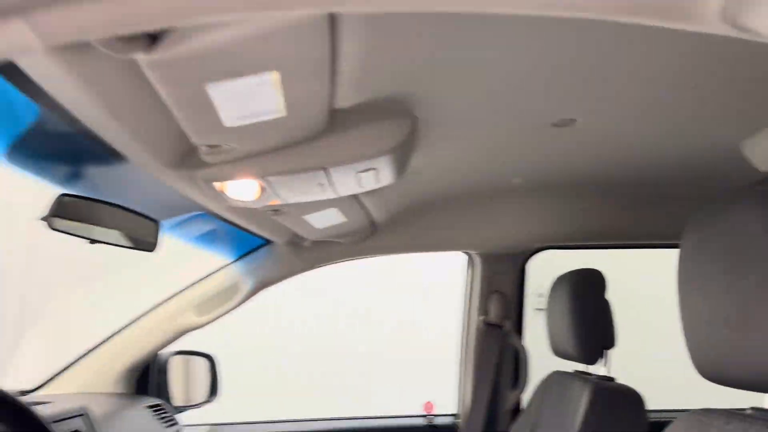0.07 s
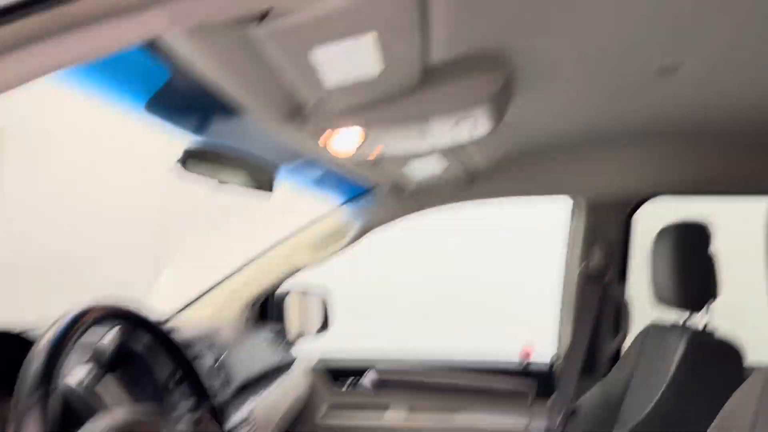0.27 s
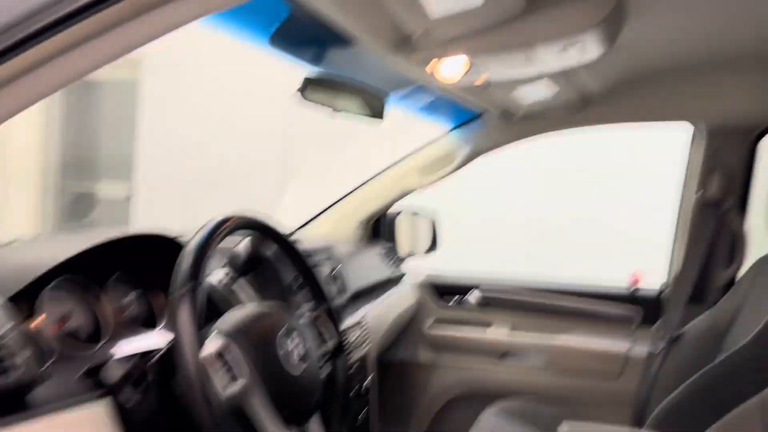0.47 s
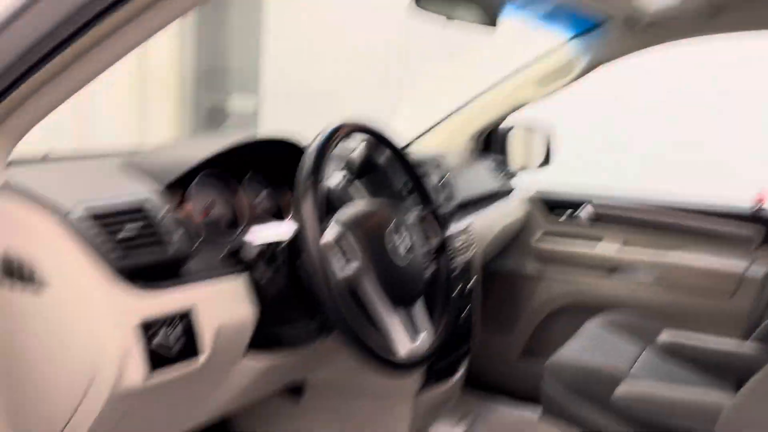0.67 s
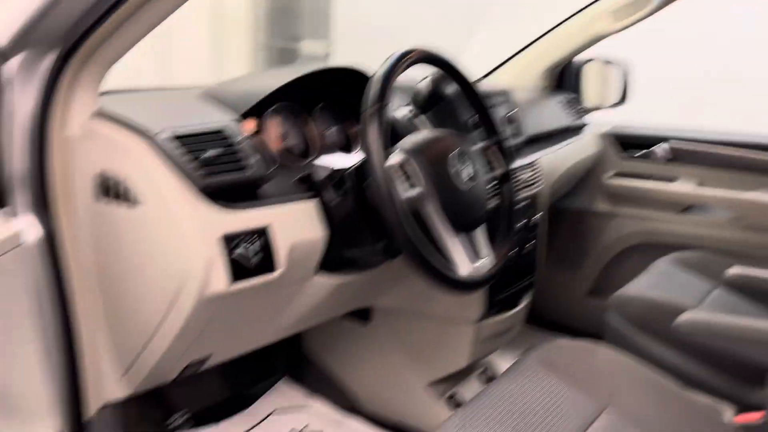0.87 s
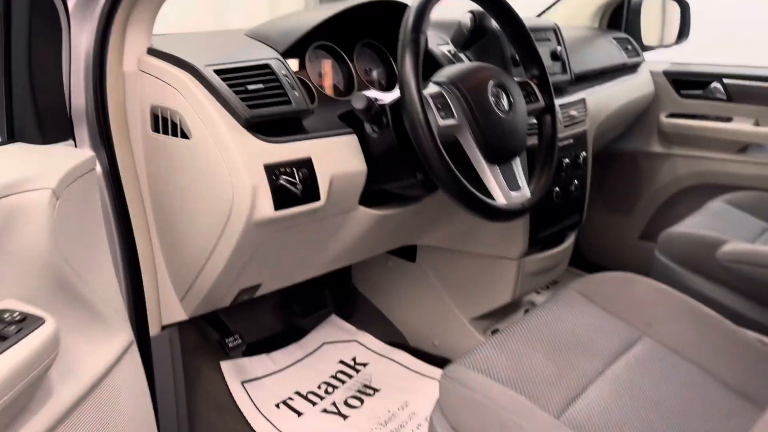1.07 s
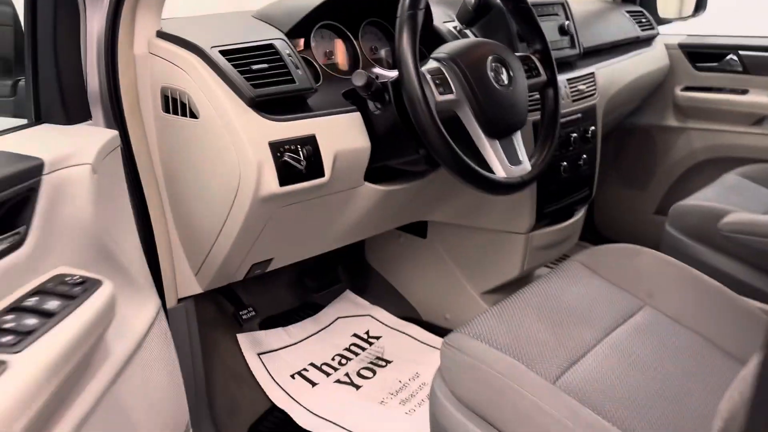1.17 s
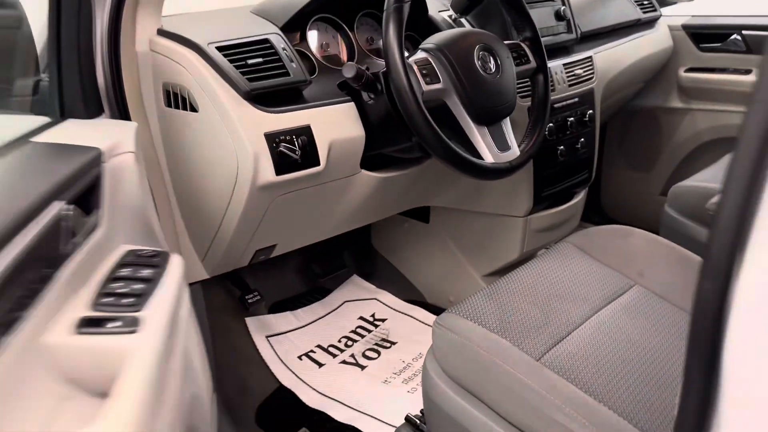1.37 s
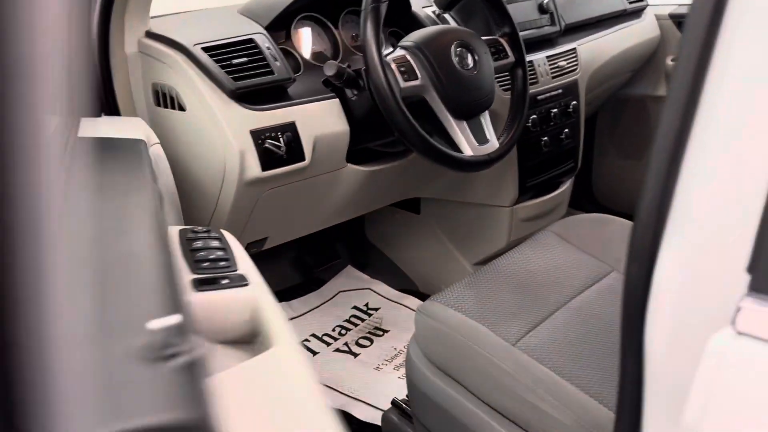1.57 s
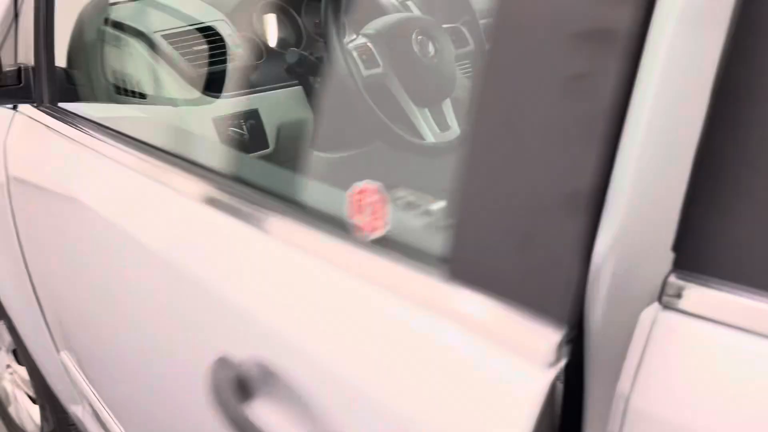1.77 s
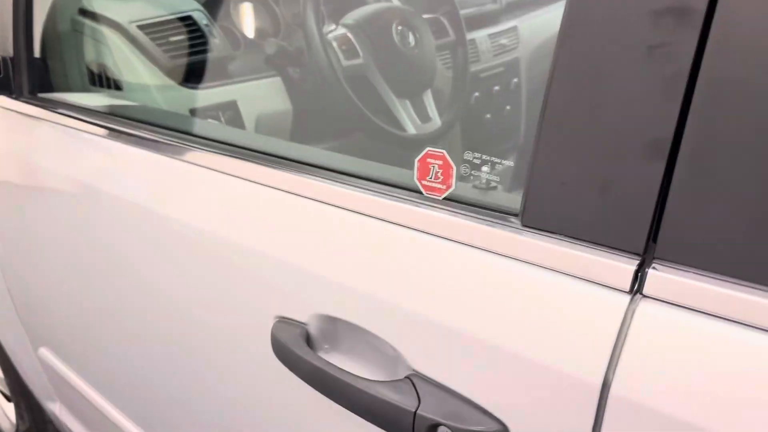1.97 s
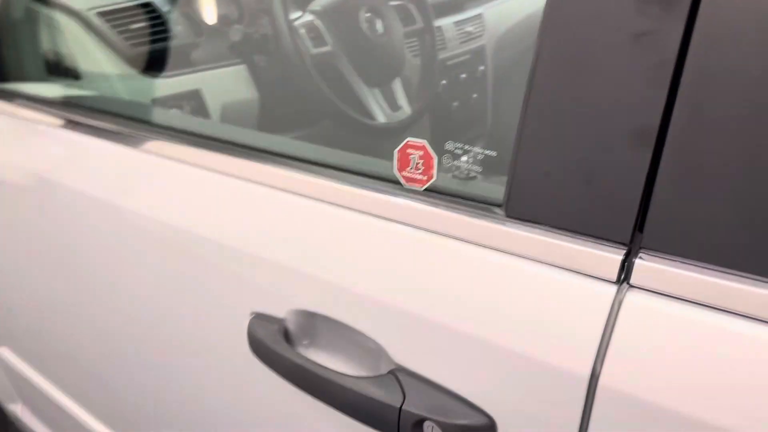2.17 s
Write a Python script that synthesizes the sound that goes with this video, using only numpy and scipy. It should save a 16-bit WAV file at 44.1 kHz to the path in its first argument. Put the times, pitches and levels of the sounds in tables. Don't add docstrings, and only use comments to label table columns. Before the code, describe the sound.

Loud vehicle door slam near the end, after low room rumble, faint taps, cloth rustle and a few sharp handle clicks; the body booms low and the hard-walled indoor space rings, recorded close in stereo.

```python
import sys
import numpy as np
from scipy import signal
from scipy.fft import rfft, irfft, next_fast_len
from scipy.io import wavfile
from scipy.ndimage import uniform_filter1d, map_coordinates

SR = 44100
rng = np.random.default_rng(int(sys.argv[2]) if len(sys.argv) > 2 else 0)


def put_to_file(sound):
    columns = np.atleast_2d(sound).T
    safe = np.clip(columns, -1, 1)
    whole_steps = np.round(safe * 32767)
    wavfile.write(sys.argv[1], SR, whole_steps.astype(np.int16))


def field_ratio(decibels):
    return 10 ** (np.asarray(decibels, dtype=float) / 20)


N = 98519
TIME = np.arange(N) / SR


def unit(x):
    return x / np.sqrt(np.mean(x ** 2) + 1e-20)


def along(points, hz):
    f, v = np.transpose(points)
    return np.interp(np.log(hz + 1), np.log(f + 1), v)


def filtered(x, response):
    n = x.shape[-1]
    m = next_fast_len(n + 8192)
    return irfft(rfft(x, m) * response(np.fft.rfftfreq(m, 1 / SR)), m)[..., :n]


def coloured(x, curve):
    return filtered(x, lambda f: field_ratio(along(curve, f)))


def band(centre_hz, q):
    return lambda f: 1j * f * centre_hz / q / (centre_hz ** 2 - f * f + 1j * f * centre_hz / q)


def wobble(rate):
    knots = rng.standard_normal(int(N * rate / SR) + 4)
    return map_coordinates(knots, [np.arange(N) * rate / SR])


def paired(noise, alike):
    turn = lambda hz: np.arccos(np.clip(along(alike, hz), -1, 1)) / 2
    mid, side = filtered(noise, lambda hz: np.array([np.cos(turn(hz)), np.sin(turn(hz))]))
    return np.array([mid + side, mid - side])


def add(track, s, sound):
    part = track[round(s * SR):][:len(sound)]
    part += sound[:len(part)]


def gate(s, length):
    fade_in = (TIME - s) / 0.01
    fade_out = (s + length - TIME) / 0.016 + 1
    return np.clip(np.minimum(fade_in, fade_out), 0, 1)


def puff(response, db, t60, rise_s=0.00037):
    t = np.arange(SR // 4) / SR
    noise = unit(filtered(rng.standard_normal(len(t)), response))
    return field_ratio(db - 60 * t / t60) * (1 - np.exp(-t / rise_s)) * noise


def ring(modes, rise_s):
    t = np.arange(SR // 2) / SR
    out = np.zeros(len(t))
    for k, (hz, db, t60) in enumerate(modes):
        out += (-1) ** k * field_ratio(db - 60 * t / t60) * np.sin(2 * np.pi * hz * t)
    return (1 - np.exp(-t / rise_s)) * out


# pitch_hz, likeness
AIR_ALIKE = [(60, 1), (240, 0.82), (950, 0.23), (3770, 0.073), (15000, 0.06)]


def wide_noise(curve):
    return unit(coloured(paired(rng.standard_normal((2, N)), AIR_ALIKE), curve))


def level_of(rows):
    return np.interp(TIME, *np.transpose(rows), right=-120)


# pitch_hz, level_db (per Hz)
VENTILATION = [(15, -47), (25, 1.5), (44, 2), (110, -2), (220, -13.5), (450, -30), (1500, -36.5),
               (15000, -60.5)]


def ventilation():
    return field_ratio(-55 + 1.2 * wobble(4.94)) * wide_noise(VENTILATION)


# time_s, level_db
SWING = [
    (1.3, -78),
    (1.4, -43),
    (1.55, -48.5),
    (1.65, -57.5),
    (1.8, -54),
    (1.87, -42),
    (1.9, -72),
]
# pitch_hz, level_db
SWING_COLOUR = [(25, -18), (45, 9), (70, 4), (110, 5), (250, -14), (600, -34), (1500, -120)]


def door_swing():
    return field_ratio(level_of(SWING) + 1.7 * wobble(12)) * wide_noise(SWING_COLOUR)


# time_s, level_db
SHUFFLE = [(0, -65), (.26, -62), (.32, -71), (.64, -68), (.75, -63), (.98, -67.5), (1.03, -72), (1.1, -63),
           (1.3, -67), (1.4, -58), (1.55, -69), (1.75, -63.5), (1.83, -60), (1.9, -44)]
# pitch_hz, level_db
CLOTH = [(120, -120), (250, 2.5), (500, -1), (1300, -10.5), (2300, -11), (3200, -19), (8000, -24.5),
         (14500, -33)]


def shuffle():
    return field_ratio(level_of(SHUFFLE) + 0.35 * wobble(22.0)) * wide_noise(CLOTH)


# start_s, level_db, top_hz, t60_s
TAPS = [(0.017, -52, 285, 0.068), (.207, -66, 807, 0.064), (0.518, -54.5, 284, 0.13),
        (0.6683, -50.5, 2730, 0.073), (.69, -51, 148, 0.64), (0.7082, -45.5, 2730, 0.083),
        (0.7395, -44, 2690, 0.074), (0.9, -58, 1200, .05), (0.95, -59, 440, 0.14), (1.15, -55, 833, 0.045),
        (1.3676, -43.5, 400, 0.067), (1.431, -55, 1070, 0.2), (1.612, -55.5, 1030, 0.077),
        (1.689, -55, 960, 0.073), (1.825, -51.5, 900, 0.82), (1.85, -41, 980, 0.36)]


def taps():
    out = np.zeros(N)
    for s, db, top_hz, t60 in TAPS:
        dull = lambda f: band(450, .6)(f) / (1 + (f / top_hz) ** 8)
        add(out, s, puff(dull, db + 2.5, t60, rise_s=0.0019))
    return out


# start_s, length_s, level_db
RUBS = [
    (1.402, 0.019, -59.5),
    (1.444, .035, -68.5),
    (1.482, 0.031, -57),
    (1.571, 0.034, -59.5),
    (1.693, 0.038, -70.5),
]
# pitch_hz, width_hz, level_db
RUB_COLOUR = [(2970, 650, 2.5), (5160, 600, 5.5), (6900, 1700, 2), (8460, 900, -4), (10300, 1500, -9)]


def rubbing():
    def surface(f):
        bands = sum(field_ratio(db) * band(hz, hz / width)(f) for hz, width, db in RUB_COLOUR)
        return bands / (1 + (f / 11500) ** 6)
    grains = rng.standard_normal(N) * field_ratio(3 * wobble(200))
    strokes = sum(field_ratio(db) * gate(s, length) for s, length, db in RUBS)
    return strokes * unit(filtered(grains, surface))


def hinge_squeak():
    start_s, end_s, pitch_hz, level_db = 1.75, 1.87, 12500, -89
    level = field_ratio(level_db + 3.1 * wobble(30)) * gate(start_s, end_s - start_s)
    return level * np.sin(2 * np.pi * np.cumsum(pitch_hz + 90 * wobble(60)) / SR)


# start_s, length_s, pitch_hz, level_db
DRONE = (1.5, 4.5, 189, -60)


def panel_hum():
    s, length, hz, db = DRONE
    return field_ratio(db + 2.4 * wobble(17)) * gate(s, length) * np.sin(2 * np.pi * hz * TIME)


# start_s, level_db, pitch_hz, t60_s
CLICKS = [(.6686, -60, 2600, .02), (.6688, -66, 9000, .012), (.7078, -56, 2700, .025),
          (.708, -62, 7300, .015), (.7397, -52, 7500, .02), (.7399, -54, 2800, .07),
          (.7401, -62, 4300, .015), (1.3655, -50, 620, .06), (1.376, -52, 600, .06),
          (1.377, -60, 5500, .012), (1.4112, -52, 2400, .07), (1.434, -42, 2200, .02),
          (1.4345, -34, 4250, .022), (1.4348, -40, 6300, .015), (1.435, -39, 8600, .015),
          (1.4345, -44, 12500, .012), (1.4711, -57, 3500, .03), (1.5272, -49, 2900, .01),
          (1.5395, -52, 10500, .012), (1.5397, -58, 4500, .012), (1.5468, -50, 6500, .012),
          (1.5474, -42, 3700, .025), (1.548, -47, 2400, .025), (1.8293, -39, 5400, .012),
          (1.8295, -43, 3000, .015), (1.8365, -44, 5500, .015), (1.838, -46, 3000, .03),
          (2.21, -66, 7000, .1)]


def clicks():
    out = np.zeros(N)
    for s, db, hz, t60 in CLICKS:
        add(out, s, puff(lambda f: band(hz, 4.2)(f) ** 2, db, t60, rise_s=0.0007))
    return out


# start_s, pitch_hz, level_db, t60_s, way (push +1, pull -1)
KNOCKS = [(.207, 96, -47.5, 0.11, 1), (.2095, 698, -58, 0.094, 1), (.7405, 1167, -43, 0.034, 1),
          (.741, 1524, -49, 0.038, -1), (.7415, 886, -45, 0.036, 1), (.7425, 650, -42.5, 0.02, -1),
          (.9015, 290, -41, 0.024, 1), (.906, 124, -42.5, 0.069, -1), (1.3655, 604, -40.5, 0.078, 1),
          (1.366, 730, -47.5, 0.067, -1), (1.376, 598, -44.5, 0.087, 1), (1.8889, 335.5, -6, 0.071, -1),
          (1.8905, 718, -12, 0.053, 1), (1.9195, 2390, -22, 0.054, 1), (1.9197, 1902, -24.5, 0.037, 1),
          (1.9227, 290, -2, 0.027, -1), (1.9238, 173, -5, .05, 1), (1.923, 554, -16, 0.014, -1),
          (1.9765, 290, -16, 0.23, -1), (2.186, 84.8, -20, 1, -1), (2.2, 149, -27, .4, 1)]


def knocks():
    out = np.zeros(N)
    for s, hz, db, t60, way in KNOCKS:
        add(out, s, way * ring([(hz, db, t60)], 0.00019))
    return out


# pitch_hz, level_db, t60_s
SHELL = [(45, -17, 1.6), (74.14, -24.5, 5.4), (92.7, -7.5, 0.36), (113.02, -9, 1.17), (109.7, -17.5, 2.23),
         (143.2, -20, 1.4), (169.3, -27.5, 1.1), (224.5, -29.5, .7)]
# time_s, level_db
SEAL = [
    (1.9, 0),
    (2.076, 0),
    (2.092, -6),
    (2.16, -5),
    (2.18, -14),
    (2.2, -5),
    (2.24, -4),
]


def boom():
    out = np.zeros(N)
    add(out, 1.9005, ring([(71, 3, 0.058)], 0.0035))
    add(out, 1.9164, ring(SHELL, 0.0022))
    return out * field_ratio(np.interp(TIME, *np.transpose(SEAL)))


# start_s, knock_db, struck_hz (panel region), crack_db, crack_t60_s
BLOWS = [(1.863, -59, 590, -41.5, 0.049), (1.8704, -17.5, 1120, -42.5, .05), (1.8747, -14, 796, -38, 0.072),
         (1.877, -14, 875, -20, 0.094), (1.882, -13.5, 600, -26.5, 0.035), (1.8875, -10.5, 698, -13, 0.013),
         (1.8917, -12, 492, -19.5, .03), (1.900, -23, 530, -23, 0.058), (1.9191, -18.5, 2300, -26.5, 0.032),
         (1.9222, -13.5, 600, -21, 0.026), (1.978, -21.5, 322, -35, .05)]
# pitch_hz, level_db, t60_s
PANEL = [(172, 5.5, 0.2), (225, 0, 0.076), (290, -2, 0.099), (346, -3.5, 0.058), (355, 0.5, 0.056),
         (425.6, -8, 0.069), (549, 1, 0.021), (698.4, -1, 0.031), (988, -3.5, 0.022), (1196, -4.5, 0.022),
         (1440, -4, 0.013), (1950, -8.5, 0.038), (2456, -14.5, 0.032), (3610, -13, 0.025)]
# pitch_hz, level_db
CRACK = [(300, -120), (800, 4), (2000, 0), (4000, -7), (7500, -15), (9000, -30), (16500, -54)]


def struck_panel(db, struck_hz):
    modes = []
    for hz, mode_db, t60 in PANEL:
        stray_hz = hz * (1 + .035 * rng.standard_normal())
        nearness_db = 40 * np.log10(abs(band(struck_hz, .7)(hz)))
        modes.append((stray_hz, db + mode_db + rng.normal(0, 1.2) + nearness_db, t60))
    return ring(modes, 0.00032)


def contacts():
    out = np.zeros(N)
    for s, db, struck_hz, crack_db, crack_t60 in BLOWS:
        add(out, s, struck_panel(db, struck_hz))
        add(out, s, puff(lambda f: field_ratio(along(CRACK, f)), crack_db, crack_t60))
    return out


# start_s, level_db, t60_s
JETS = [
    (1.885, -22, 0.036),
    (1.896, -29.5, 0.081),
    (1.92, -38, 0.056),
]
# pitch_hz, level_db
JET_COLOUR = [(6000, -120), (8300, -8.5), (9500, -1), (12000, 0), (14000, -3), (15600, -7.5), (16500, -16)]


def seal_jets():
    out = np.zeros(N)
    for s, db, t60 in JETS:
        add(out, s, puff(lambda f: field_ratio(along(JET_COLOUR, f)), db, t60, rise_s=0.0014))
    return out


# pitch_hz, left_over_right_db
SIDES = [(60, 2.5), (240, 1), (950, 6), (3770, 0), (15000, 8)]


def ports(x, lead):
    half = np.array([[.5], [-.5]])
    return filtered(x, lambda f: field_ratio(half * along(SIDES, f)) * np.exp(1j * half * lead(f)))


# pitch_hz, lead_radians
DOOR_LEAD = [(0, -0.5), (1700, .6), (4500, 1.37), (6500, 1.56), (8000, 6.5), (8900, 1.5), (10000, 1),
             (10800, 0.5), (13000, 2), (15000, 0.8)]


def from_door(x):
    return ports(x, lambda f: along(DOOR_LEAD, f))


def from_hand(x):
    lead_s, lead_top_hz = .000417, 9600
    return ports(x, lambda f: 2 * np.pi * lead_s * np.minimum(f, lead_top_hz))


# pitch_hz, t60_s
HALL_DECAY = [(60, .9), (250, 0.9), (500, .8), (1000, 0.54), (4000, 0.6), (7500, 0.56), (10000, .5),
              (14000, 0.47)]
# pitch_hz, level_db
HALL_COLOUR = [(60, -12), (200, -8), (450, -7), (1000, -8), (4000, -12.5), (7500, -10), (10500, -22),
               (14300, -27), (15000, -58.5)]
# pitch_hz, likeness
HALL_ALIKE = [(60, 0.69), (400, 0.65), (1500, 0), (5000, 0), (12000, 0.85)]


def hall(x):
    noise = paired(rng.standard_normal((2, SR // 2)), HALL_ALIKE)
    hz, t, z = signal.stft(noise, SR, nperseg=512)
    patches = uniform_filter1d(rng.standard_normal(z.shape[1:]), size=12, axis=0)
    patches = unit(uniform_filter1d(patches, size=4, axis=1))
    z = z * field_ratio(2.3 * patches - 60 * t / along(HALL_DECAY, hz)[:, None])
    z = z / np.sqrt(np.sum(abs(z) ** 2, axis=(0, 2), keepdims=True))
    z = z * field_ratio(along(HALL_COLOUR, hz))[:, None]
    tail = signal.istft(z, SR, nperseg=512)[1]
    build_up = 1 - np.exp(-np.arange(tail.shape[1]) / SR / 0.0067)
    tail = tail / np.linalg.norm(tail[0]) * build_up
    return signal.fftconvolve(x[None], tail, axes=1)[:, :N]


def scene():
    air = ventilation() + door_swing() + shuffle()
    bits = taps() + rubbing() + hinge_squeak() + panel_hum()
    ticks, dull, low = clicks(), knocks(), boom()
    slam = contacts() + seal_jets()
    near = from_door(slam + dull + low + ticks) + field_ratio(0.5) * from_hand(bits)
    slam_hall = field_ratio(-7.0) * hall(slam + field_ratio(-7) * dull + field_ratio(-16) * low)
    return near + slam_hall + field_ratio(-14) * hall(bits + ticks) + air


def low_pass(x):
    return signal.sosfilt(signal.butter(12, 15850, fs=SR, output="sos"), x)


# pitch_hz, side_gain_db
WIDTH = [(9800, 0), (10600, -40), (13300, -40), (13900, 0), (16500, 0)]


def record(dry):
    mid = dry.mean(axis=0)
    side = coloured(dry[0] - dry[1], WIDTH) / 2
    stereo = np.array([mid + side, mid - side])
    heard = filtered(stereo, lambda f: 1 / np.sqrt(1 + (f / 15600) ** 40))
    limited = heard / (1 + abs(heard / .93) ** 5) ** (1 / 5)
    return low_pass(limited)


dry = scene()
out = record(dry)
put_to_file(out)
```